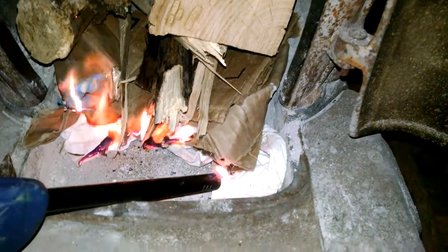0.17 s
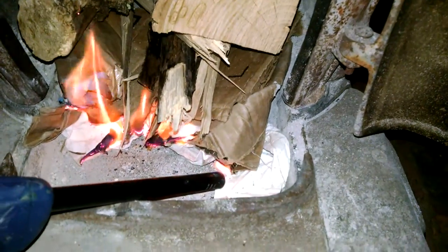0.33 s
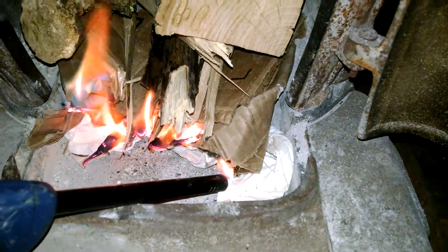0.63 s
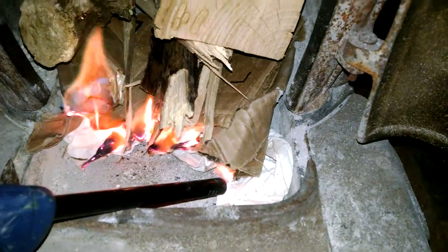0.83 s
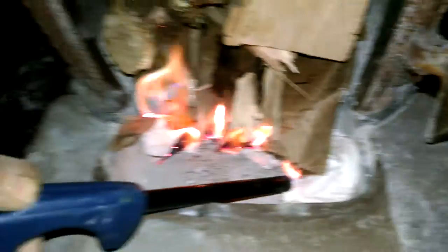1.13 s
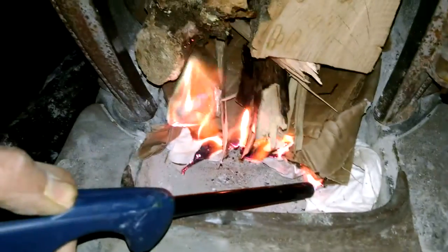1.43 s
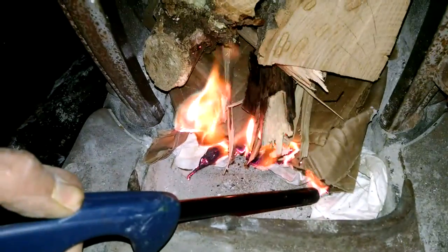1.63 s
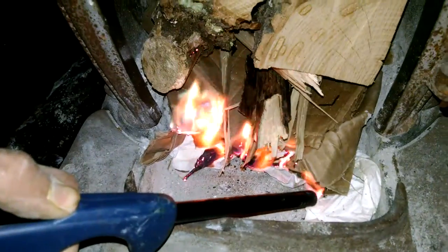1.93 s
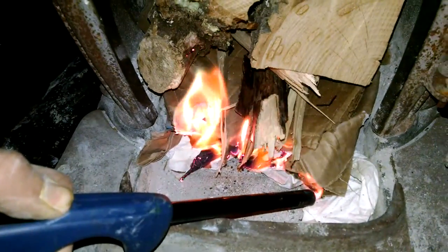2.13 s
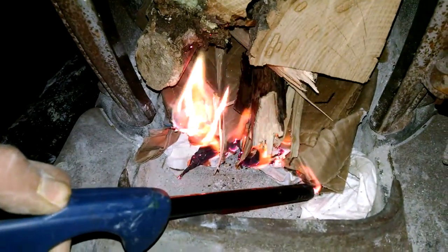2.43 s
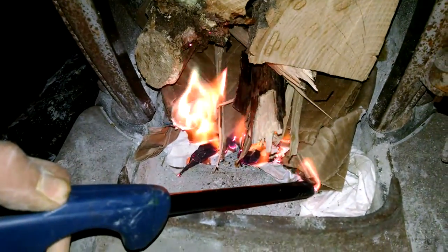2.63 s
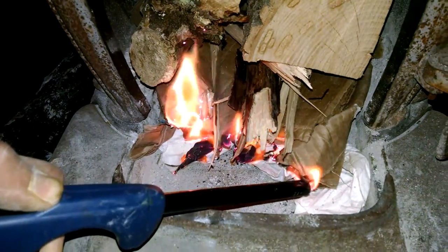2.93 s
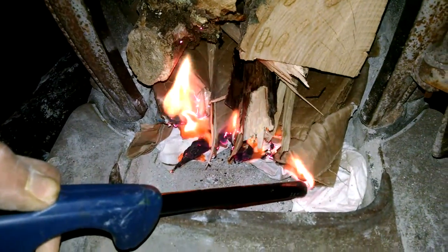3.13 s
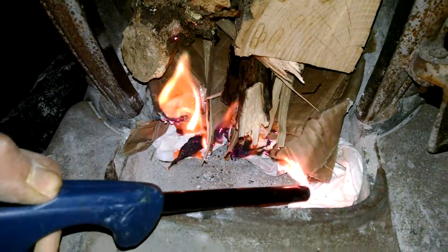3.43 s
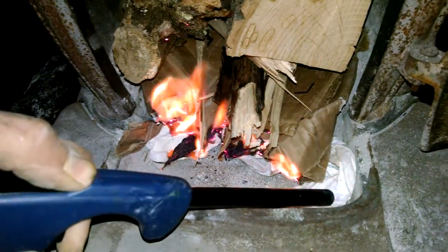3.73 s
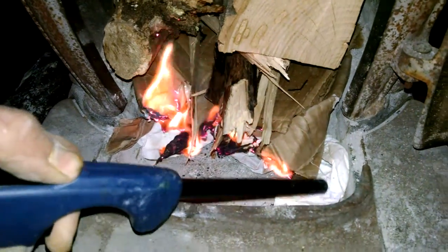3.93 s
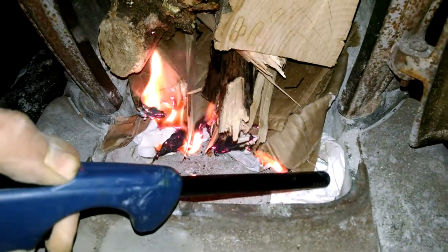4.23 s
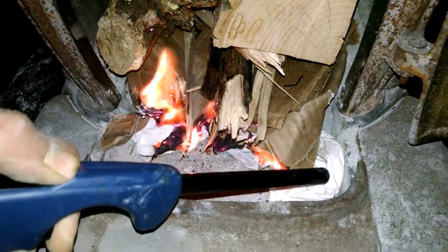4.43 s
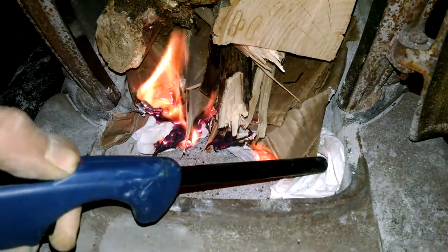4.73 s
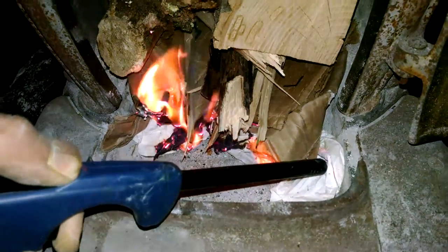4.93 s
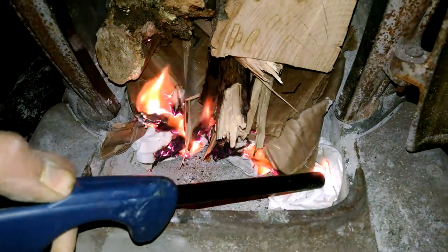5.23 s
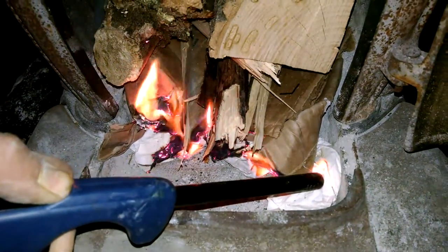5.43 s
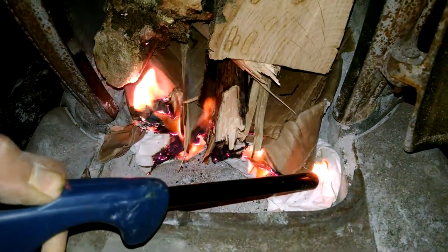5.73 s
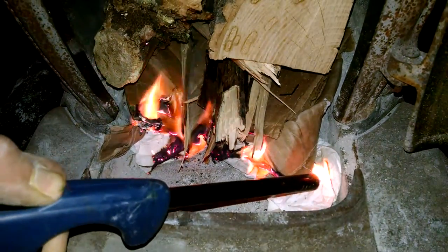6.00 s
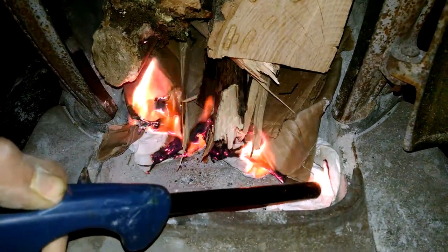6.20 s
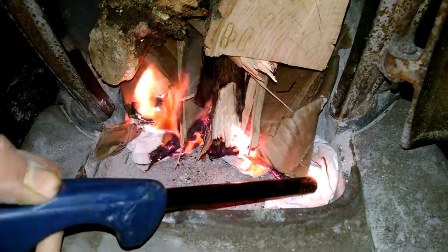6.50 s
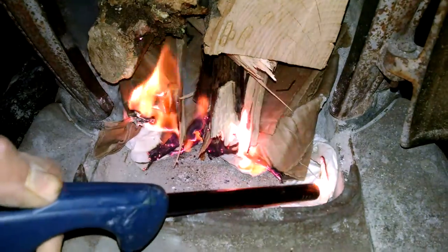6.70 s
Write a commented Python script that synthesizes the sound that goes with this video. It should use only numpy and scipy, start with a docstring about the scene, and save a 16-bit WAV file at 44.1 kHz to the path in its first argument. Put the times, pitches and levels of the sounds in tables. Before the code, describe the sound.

Close up in a small iron stove, paper and cardboard kindling burns with a high, airy sizzle over a very soft draught and faint low rumble. From 0 to 0.4 s a lighter scuffs and bumps the floor dully, ending in a low, briefly ringing knock. Sharp, dry snaps scatter through 0.5-2 s, notably around 1.5-1.65, while the hiss strengthens from about 2.3. Tiny crackles crowd together at 2.75-3.3 s. At 3.32 a hard, loud knock rings shortly, followed until 3.8 by rattling taps and gritty dragging, with a small scrape near 3.95. A bright pop snaps at 4.07. Then it is sparser: faint card ticks, dry paper crinkles, a hiss swell near 5.25 and soft rustles. Crisp pops return at 6.44-6.57, the last strongest with a small papery thud, before a light knock at 6.85.

```python
"""In a wood stove, paper and cardboard kindling catches while a gas lighter is held to it.
A soft draught and rumble lie under a bright sizzle, all made of coloured noise. Random tiny clicks
crackle in bursts; short noise bursts make the pops, ticks and rustles. The lighter knocks and drags
on the stove floor, which rings as a set of fading sines. The recorder widens the stereo with a
short, inverted delay."""
import sys
import numpy as np
from scipy import signal
from scipy.fft import rfft, irfft, next_fast_len
from scipy.io import wavfile

SR = 44100
rng = np.random.default_rng(int(sys.argv[2]) if len(sys.argv) > 2 else 0)


def log_audio(samples):
    """Write samples as a 16-bit WAV file to the path given in sys.argv[1]."""
    # one column per channel
    frames = np.atleast_2d(samples).T
    # limit to full scale, then quantise
    limited = np.clip(frames, -1, 1)
    pcm = np.round(limited * 32767).astype(np.int16)
    wavfile.write(sys.argv[1], SR, pcm)


N = 302545   # samples


def amp(db):
    """Turn dB into a gain."""
    return 10 ** (np.asarray(db) / 20)


def rms_one(x):
    """Scale a sound so that its rms strength is 1."""
    return x / np.sqrt(np.mean(x ** 2) + 1e-20)


def in_time(rows):
    """Join the points of a curve table with straight lines, one value per sample."""
    times, *columns = np.transpose(rows)
    return [np.interp(np.arange(N) / SR, times, column) for column in columns]


SPECTRUM_TOP_HZ = 15800   # nothing above this in coloured noise


def coloured(x, spectrum):
    """Give a sound the tone balance of a spectrum table, cut off at the top, with rms 1."""
    size = next_fast_len(N)
    hz = np.arange(size // 2 + 1) * SR / size + 1   # 1 Hz up, to avoid log(0)
    points_hz, points_db = np.transpose(spectrum)
    gain = amp(np.interp(np.log(hz), np.log(points_hz), points_db))
    gain = gain * (hz < SPECTRUM_TOP_HZ)
    return rms_one(irfft(rfft(x, size) * gain, size)[:N])


def drift(rate_hz):
    """Wander slowly at random: noise smoothed by two poles, rms 1."""
    r = np.exp(-2 * np.pi * rate_hz / SR)
    noise = rng.standard_normal(N + SR)
    wander = signal.lfilter([1], [1, -2 * r, r * r], noise)
    return rms_one(wander[SR:])   # skip the filter's first second


def band(x, low_hz, high_hz):
    """Keep only the pitches between two edges."""
    edges = [low_hz, min(high_hz, .45 * SR)]
    return signal.sosfilt(signal.butter(2, edges, "band", fs=SR, output="sos"), x)


def ring(x, hz, t60):
    """Resonate like one mode: a click of 1 starts a sine of height 1 that fades 60 dB in t60 seconds."""
    r, w = amp(-60 / (t60 * SR)), 2 * np.pi * hz / SR
    return signal.lfilter([0, np.sin(w)], [1, -2 * r * np.cos(w), r * r], x + 1e-18)


def add(out, s, sound):
    """Mix a short sound in at s seconds."""
    i = round(s * SR)
    out[i:i + len(sound)] += sound[:N - i]


def burst(low_hz, high_hz, t60, click):
    """Make a click with a dying noise tail in one band, peak 1."""
    t = np.arange(2000) / SR
    push = rng.standard_normal(len(t)) * amp(-60 * t / t60)
    push[0] = click
    sound = band(push, low_hz, high_hz)
    return sound / np.abs(sound).max()


# tone balance of the draught: f/Hz, level/dB (only the shape matters)
DRAUGHT = [(20, -15), (55, 8), (110, -5), (200, 1.5), (260, 3), (350, -8.5), (460, -9.5), (600, -13),
           (800, -21), (1200, -18.5), (2000, -21), (4000, -18.5), (7000, -19), (15000, -21.5)]
DRAUGHT_DB = -53


def draught():
    """Soft flow of air: coloured noise whose level wanders a little."""
    wander_db = .5 * drift(3) + drift(14)
    return coloured(rng.standard_normal(N), DRAUGHT) * amp(DRAUGHT_DB + wander_db)


PORT_RUMBLE_DB, PORT_RUMBLE_HZ = -56.5, 250   # level, upper edge


def port_rumble():
    """Low rumble at the two microphone ports: separate low noise on each side."""
    noise = band(rng.standard_normal((2, N)), 21.5, PORT_RUMBLE_HZ)
    return amp(PORT_RUMBLE_DB) * rms_one(noise)


# strength of the sizzle as the kindling burns: t/s, level/dB
BURN = [(0.0, -50.5), (0.42, -51), (0.71, -53.5), (1.2, -51), (1.89, -50), (2.29, -45.5), (2.79, -46),
        (3.63, -48), (4.28, -47), (4.57, -50.5), (4.79, -51.5), (5.24, -46.5), (5.7, -52), (5.98, -49.5),
        (6.17, -51.5), (6.5, -47), (6.69, -52), (6.86, -52)]
# tone balance of sizzle and crackle: f/Hz, level/dB (only the shape matters)
SIZZLE = [(3000, -22), (6000, -16), (8000, -9.5), (10000, -3.5), (12000, 0.5), (13800, 5.5), (15000, -4),
          (15800, 5)]


def sizzle():
    """Smooth sizzle of escaping gas: bright noise that follows the burn and flutters quickly."""
    level_db = in_time(BURN)[0] + 1.55 * drift(23)
    return coloured(rng.standard_normal(N), SIZZLE) * amp(level_db)


# flurries of crackle: t/s (start), build-up/s, hold/s, level/dB
FLURRIES = [(0.381, .11, 0.018, -51), (1.344, 0.052, .15, -48.5), (2.034, 0.1, 0.14, -45),
            (2.473, .08, 0.063, -49), (2.756, 0.0052, .085, -46.5), (2.976, 0.038, 0.093, -48.5),
            (3.187, .04, .13, -41.5), (3.598, .09, .03, -46), (3.812, .09, .11, -48),
            (4.24, 0.084, .1, -53.5), (4.943, .2, .3, -55), (5.742, 0.24, .2, -54),
            (6.455, 0.092, 0.045, -51.5)]
FLURRY_FADE_DB_PER_S, CALM_CRACKLE_DB = 195.5, -59.5


def crackle_db():
    """Crackle level over time: each flurry builds up out of the calm, holds and fades."""
    t, level = np.arange(N) / SR, np.full(N, float(CALM_CRACKLE_DB))
    for s, build_s, hold_s, top_db in FLURRIES:
        rising = CALM_CRACKLE_DB + (top_db - CALM_CRACKLE_DB) * (t - s) / build_s
        fading = top_db - FLURRY_FADE_DB_PER_S * (t - s - build_s - hold_s)
        flurry = np.minimum(np.minimum(rising, fading), top_db)
        level = np.maximum(level, flurry)
    return level


DENSER_PER_DB = 1.7   # dB more snaps per second for each dB of crackle


def crackle():
    """Tiny fibres snap at random in uneven clumps, each a click of noise that dies within a millisecond."""
    level_db = crackle_db()
    denser_db = DENSER_PER_DB * (level_db - CALM_CRACKLE_DB)
    snaps_per_s = 400 * amp(3 * drift(30) + denser_db)
    born = rng.random(N) < snaps_per_s / SR
    sizes = amp(6.8 * np.minimum(rng.exponential(1, N), 3.0)) * born
    fading = amp(-60 / (.0007 * SR))
    snaps = signal.lfilter([1], [1, -fading], sizes) * rng.standard_normal(N)
    evened = snaps / amp(denser_db / 2)   # so that more snaps do not also add level
    return amp(level_db) * coloured(evened, SIZZLE)


# lighter knocking the stove floor: t/s, level/dB (base strength), f/Hz (best-struck pitch),
# brightness/(dB per octave above that pitch), woody clack/dB (relative to level)
KNOCKS = [(.002, -36, 610, 0, -31), (.02, -42, 930, -3, -25), (.04, -47, 620, -4, -29),
          (.075, -44, 450, -6, -25), (.112, -40.5, 597, -15, -18), (.14, -50, 600, -15, -20),
          (.18, -38, 452, -16, -20), (.214, -35.5, 452, -3, -23), (.296, -59, 820, -5, -25),
          (.338, -23.5, 435, -27, -31), (.339, -40, 830, -12, -30), (.357, -27.5, 437, -17, -38),
          (3.3245, -12.5, 646, 1, -8), (3.345, -24, 600, 1.5, -5.5), (3.374, -24.5, 667, -2, -13),
          (3.394, -38, 656, -1, -8), (3.483, -32, 550, -11, -15), (3.502, -32, 670, 0.5, -15),
          (3.511, -30, 805, 2, -11), (3.514, -30.5, 484, 5, -19), (3.536, -31.5, 815, -5, -8),
          (3.537, -25, 491, 1, -23), (3.578, -36, 810, -2, -20), (3.605, -29, 550, -6, -7),
          (3.611, -25.5, 827, 3, -31), (3.636, -28.5, 665, 5.5, -15), (3.655, -32, 816, -1, -16),
          (3.661, -26.5, 379, 3.5, -16), (3.672, -27, 815, -1, -24), (3.684, -36, 790, 5, -25),
          (3.697, -41, 805, 1, -12), (3.711, -40, 820, 0, -17), (3.942, -37, 573, 5, -10),
          (6.848, -27, 616, 0.5, -10.5)]
# lighter dragging over the stove floor, one list per stroke: t/s, scuff level/dB, grit level/dB # (the scuff
# level sets the drive into the ringing modes, before their gains; the grit level sets the gritty noise as
# heard)
DRAG = [
    [(0.0, -25.5, -79), (0.03, -36, -79), (0.1, -39, -65), (0.2, -37.5, -57), (0.24, -43.5, -73),
     (0.33, -37, -60), (0.42, -44.5, -82), (0.5, -43, -73)],
    [(3.38, -37, -71), (3.43, -33.5, -55), (3.49, -32, -56.5), (3.52, -26.5, -60), (3.56, -33, -48.5),
     (3.6, -21.5, -52), (3.65, -26.5, -47.5), (3.7, -38, -47.5), (3.73, -39, -49.5), (3.75, -40.5, -57),
     (3.79, -33.5, -54)],
    [(3.91, -38.5, -51), (3.96, -37.5, -70), (4.04, -42.5, -76), (4.12, -56, -77)],
]
# ringing modes of stove floor and lighter barrel: f/Hz, level/dB, t60/s
STOVE = [(303, -7, 0.051), (362.6, -12, 0.18), (452, -7, 0.14), (507.6, -7.5, 0.11), (600.6, -4, 0.15),
         (663, -10.5, 0.057), (755, -39, 0.024), (812.7, -2.5, 0.14), (893, -21.5, 0.075),
         (990, -11.5, 0.25), (1114, -9.5, 0.045), (1356, -16, 0.12), (1800, -17, 0.07), (2630, -11, 0.03),
         (3010, -5, .03), (3305, -13.5, 0.082), (3920, -17, 0.1), (4830, -34, 0.037), (5570, -19, 0.056),
         (6200, -19, 0.13), (6860, -12, 0.13)]
HARD_DB, SLIP_JITTER = -22, 0.067   # softer knocks slide; random spread of their slip spacing


def knock_touches():
    """A hard knock lands at once; a softer one slides in four slips, nearly one best-pitch cycle apart."""
    s, peak_db, best_hz, _, _ = np.transpose(KNOCKS)
    at = np.round(s * SR).astype(int)
    spacing = np.where(peak_db < HARD_DB, 1 / best_hz, 0)[:, None]
    uneven = 1 + SLIP_JITTER * rng.standard_normal((len(s), 1))
    slip_times = spacing * np.arange(4) * uneven
    return np.minimum(at[:, None] + np.round(slip_times * SR).astype(int), N - 1)


def drag_strokes():
    """Pressure and grit gains over time, silent between the strokes."""
    pressure, grit = np.zeros((2, N))
    for rows in DRAG:
        times, scuff_db, grit_db = np.transpose(rows)
        t = np.arange(round(times[0] * SR), round(times[-1] * SR))
        pressure[t] = amp(np.interp(t / SR, times, scuff_db))
        grit[t] = amp(np.interp(t / SR, times, grit_db))
    return pressure, grit


def lighter():
    """Knocks favour the modes near where they land; dragging feeds the low modes uneven, wandering slips."""
    s, peak_db, best_hz, bright_db, clack_db = np.transpose(KNOCKS)
    spread = rng.standard_normal((len(s), len(STOVE)))
    touches = knock_touches()
    pressure, grit = drag_strokes()
    slip_clicks = (rng.random(N) < 1500 / SR) * rng.standard_normal(N)
    slips = rms_one(slip_clicks * amp(3.0 * drift(40)))
    scuff = band(band(slips, 282, 780), 282, 780) * pressure
    out = scuff   # the dull scuff is heard directly too
    for k, (hz, mode_db, t60) in enumerate(STOVE):
        push = scuff * amp(-41.0 + 4.1 * drift(25.0))
        octaves = np.log2(hz / best_hz)
        favour_db = 14.1 * np.exp(-(octaves / 0.27) ** 2)
        tilt_db = bright_db * np.maximum(octaves, 0)
        strength = amp(peak_db - 13.5 + favour_db + tilt_db + 2.2 * spread[:, k])
        np.add.at(push, touches, strength[:, None] / 4)   # shared by the four touches
        out = out + amp(mode_db) * ring(push, hz, t60) * (-1) ** k
    gritty = band(rng.standard_normal(N) + 1.0 * slips, 680, 19000)
    out = band(out, 220, 21000) + grit * gritty
    for when, level_db in zip(s, peak_db + clack_db):
        woody = burst(570, 935, 0.13, 3.3)
        crack = burst(1400, 14500, .03, 4.0)
        add(out, when, amp(level_db) * (woody + amp(2.5) * crack))
    return out


SMALL_POPS, SMALL_POP_DB, SMALL_POP_SPREAD_DB = 120, -34, 3   # count, middle level, spread either way
SMALL_POP_BODY_DB = -31   # middle body level, relative to the click
SMALL_POP_GROWTH = 0.16   # dB per dB of crackle


def small_pops():
    """Draw small pops that crowd into the flurries and grow with them."""
    level_db = crackle_db()
    share = np.cumsum(amp(level_db))
    when, size, body = rng.random((SMALL_POPS, 3)).T
    at = np.searchsorted(share, (np.arange(SMALL_POPS) + when) / SMALL_POPS * share[-1])
    growth_db = SMALL_POP_GROWTH * (level_db[at] - CALM_CRACKLE_DB)
    pop_db = SMALL_POP_DB + growth_db + SMALL_POP_SPREAD_DB * (2 * size - 1)
    body_db = SMALL_POP_BODY_DB + 2 * SMALL_POP_SPREAD_DB * (2 * body - 1)
    return list(zip(at / SR, pop_db, body_db))


# the clearest snaps of fibre: t/s, level/dB (peak of the click), body level/dB (relative to the click)
POPS = [(0.1281, -16.5, -19.5), (0.1318, -32, -22), (0.1405, -36, -22), (0.1475, -31, -25),
        (0.198, -35, -27), (0.288, -23, -15), (0.463, -25.5, -6), (0.479, -31, -7), (0.517, -28, -30),
        (0.526, -27, -16), (0.539, -13, -26), (0.578, -31, -30), (0.598, -31, -30), (0.659, -32, -30),
        (0.676, -18.5, -20), (0.744, -31, -5), (0.7978, -17.5, -12.5), (0.8096, -24, -9),
        (0.9067, -20, -18), (0.915, -18.5, -19), (1.134, -21, -11.5), (1.254, -27, -16), (1.26, -31, -9),
        (1.273, -34, -18), (1.3646, -20.5, -18), (1.386, -30, -15), (1.4145, -26, -22), (1.4202, -19, -22),
        (1.429, -28, -22), (1.468, -12, -24), (1.477, -17, -40), (1.5328, -18, -26), (1.545, -26, -24),
        (1.551, -23, -25), (1.643, -11, -22), (1.7665, -22, -16), (1.975, -25, -25), (2.1316, -20, -18),
        (2.167, -29, -35), (2.1733, -23, -30), (2.177, -26, -30), (2.2007, -22, -30), (2.218, -18, -18),
        (2.2382, -30, -25), (2.2573, -29, -35), (2.319, -18.5, -20), (2.3594, -21, -41), (2.387, -21, -26),
        (2.4345, -31, -32), (2.538, -23, -37), (2.553, -20, -21), (2.578, -23, -16), (2.6995, -20, -18),
        (2.7185, -32, -35), (2.767, -25, -35), (2.769, -19.5, -31), (2.7768, -17, -39), (2.780, -23, -35),
        (2.783, -24, -35), (2.7902, -27, -35), (2.793, -26, -35), (2.796, -16, -35), (2.8024, -21, -35),
        (2.8086, -20, -35), (2.8155, -22, -35), (2.8182, -21, -35), (2.823, -31, -35), (2.8266, -22, -35),
        (2.838, -22, -23), (2.8445, -25, -35), (2.8512, -17.5, -24), (2.8695, -27, -35), (2.8855, -33, -35),
        (2.9, -33, -35), (2.9716, -17.5, -23), (3.0016, -21, -27), (3.012, -23, -32), (3.014, -17, -29),
        (3.021, -31, -32), (3.0288, -29, -32), (3.0387, -26, -32), (3.0518, -21, -32), (3.065, -24, -32),
        (3.0675, -21, -32), (3.077, -19, -24), (3.083, -22, -30), (3.1284, -11.5, -27), (3.138, -26, -34),
        (3.1455, -24, -30), (3.151, -25, -34), (3.169, -24, -34), (3.193, -24, -30), (3.213, -21, -34),
        (3.217, -29, -34), (3.232, -28, -34), (3.242, -27, -34), (3.25, -27, -34), (3.2587, -41, -21),
        (3.2723, -26, -9), (3.279, -18, -32), (3.288, -21, -32), (3.361, -24, -7), (3.64, -23, -25),
        (3.673, -20, -32), (3.717, -23, -22), (3.727, -22, -21), (3.836, -18.5, -15.5), (3.8865, -21, -16),
        (3.911, -13.5, -36), (3.941, -22, -15), (4.001, -21, -26), (4.0744, -9, -28), (4.1302, -17.5, -27),
        (4.1705, -22, -29), (4.489, -20, -23), (4.574, -23, -13), (4.596, -24, -11), (5.009, -29.5, -9),
        (5.175, -17.5, -29), (5.759, -24, -17), (5.783, -30.5, -6), (5.848, -23, -11), (5.9131, -38, -40),
        (6.433, -20, -33), (6.4402, -12.5, -20), (6.4922, -14, -33), (6.4936, -22, -30), (6.4942, -25, -30),
        (6.4954, -23, -30), (6.4966, -30, -30), (6.5352, -27, -20), (6.537, -25, -20), (6.5618, -7, -21),
        (6.564, -13, -15), (6.564, -20, -13), (6.693, -30, -13), (6.7674, -27.5, -8)]


def pops():
    """Fibres snap: each pop is a very short bright click with a longer, duller body."""
    out = np.zeros(N)
    for s, pop_db, body_db in list(POPS) + small_pops():
        click = burst(10800, 16500, .002, 7.0)
        body = burst(2000, 11000, .015, 6.0)
        add(out, s, amp(pop_db) * (click + amp(body_db) * body))
    return out


# paper curling and slumping: t/s, length/s, f/Hz (centre), level/dB (before the fade)
RUSTLES = [(0.163, 0.012, 1630, -55.5), (0.4605, 0.025, 3900, -47.5), (0.735, 0.012, 2630, -58),
           (1.022, 0.024, 3520, -58), (1.396, 0.27, 1340, -67.5), (2.216, 0.032, 2950, -57),
           (3.27, .008, 3500, -60), (5.232, 0.017, 1210, -58.5), (5.236, 0.028, 2600, -55.5),
           (5.258, 0.015, 202, -55), (5.369, 0.028, 325, -48.5), (6.441, 0.0068, 1910, -40),
           (6.443, 0.017, 580, -45.5), (6.564, 0.011, 1670, -45.5), (6.566, 0.0088, 527, -36),
           (6.58, 0.029, 574, -51.5), (6.654, 0.009, 5650, -48.5)]


def rustles():
    """Paper curls and slumps: crumbly noise around one pitch, sudden and fading."""
    out = np.zeros(N)
    for s, length, hz, level_db in RUSTLES:
        t = np.arange(round(2 * length * SR)) / SR
        noise = band(rng.standard_normal(len(t)), hz / 1.33, hz * 1.38)
        fade = np.exp(-(t / length) ** 2)
        add(out, s, amp(level_db) * rms_one(noise) * fade)
    return out


SMALL_TICKS, SMALL_TICK_DB, SMALL_TICK_SPREAD_DB = 30, -50, 4.0   # count, middle level, spread either way
SMALL_TICK_LOW_HZ, SMALL_TICK_HIGH_HZ = 350, 950


def small_ticks():
    """Draw faint ticks at any time and any pitch in their range."""
    when, size, pitch = rng.random((SMALL_TICKS, 3)).T
    level_db = SMALL_TICK_DB + SMALL_TICK_SPREAD_DB * (2 * size - 1)
    hz = SMALL_TICK_LOW_HZ * (SMALL_TICK_HIGH_HZ / SMALL_TICK_LOW_HZ) ** pitch
    return list(zip(when * N / SR, level_db, hz))


# the clearest ticks of card and char settling: t/s, level/dB (peak), f/Hz (centre)
TICKS = [(0.517, -46.5, 490), (0.725, -42.5, 507), (0.796, -34, 900), (0.837, -45, 674), (0.905, -42, 593),
         (1.133, -36.5, 785), (1.228, -44.5, 870), (1.271, -46.5, 920), (1.3637, -31.5, 286),
         (1.365, -38.5, 110), (1.939, -46, 775), (2.217, -47, 870), (2.526, -39.5, 480), (2.606, -46, 467),
         (2.709, -49, 1110), (3.911, -40, 524), (4.074, -43.5, 447), (4.15, -46, 925), (4.381, -51, 930),
         (4.573, -44, 428), (4.753, -43.5, 590), (4.835, -45, 487), (5.176, -43, 760), (5.237, -54, 1110),
         (5.262, -42.5, 420), (5.372, -47, 450), (5.389, -42, 414), (5.437, -47, 940), (5.488, -53, 654),
         (5.835, -43, 910), (6.203, -50, 715), (6.414, -42, 560), (6.462, -47, 795), (6.484, -49, 497),
         (6.492, -49, 600), (6.515, -44, 474), (6.527, -57, 480), (6.556, -37, 400), (6.563, -31, 560),
         (6.658, -38.5, 475)]


def ticks():
    """Card and char settle: each tick is a short wooden thud around one pitch."""
    out = np.zeros(N)
    for s, peak_db, hz in list(TICKS) + small_ticks():
        add(out, s, amp(peak_db) * burst(hz / 1.9, hz * 1.5, 0.055, 16.0))
    return out


# faint dry ticks of charring paper: t/s, level/dB (peak), f/Hz (centre)
CRINKLES = [(0.7218, -47, 1470), (0.7973, -47, 1440), (1.1323, -53, 1470), (1.2285, -40, 1240),
            (1.271, -37, 3940), (1.363, -46, 1350), (1.625, -45, 1440), (1.6417, -46, 3310),
            (2.218, -52, 1330), (2.2882, -45, 3560), (2.5985, -34.5, 3400), (2.7092, -45, 1460),
            (3.2715, -38, 3330), (4.0307, -43, 1790), (4.15, -50, 1440), (4.5725, -46, 1480),
            (5.038, -38, 3810), (5.175, -43, 1710), (5.4365, -45, 1630), (5.7074, -38, 3870),
            (5.7907, -52, 1280), (5.8356, -43, 1260), (6.1422, -36, 3760), (6.2008, -45, 1510),
            (6.4396, -31, 1440), (6.561, -32, 1360), (6.6386, -43, 1510), (6.657, -42, 1660),
            (6.7151, -48, 3560)]


def crinkles():
    """Charring paper ticks drily: shorter bursts, each around one pitch."""
    out = np.zeros(N)
    for s, peak_db, hz in CRINKLES:
        add(out, s, amp(peak_db) * burst(hz / 1.8, hz * 2.2, .018, 9.0))
    return out


def firebox(x):
    """Add a few close echoes off the iron walls."""
    out = x.copy()
    for lag_s, echo_db in [(.0007, -12), (.0019, -19), (.0041, -24)]:
        lag = round(lag_s * SR)
        out[lag:] += amp(echo_db) * x[:-lag]
    return out


def scene():
    """Mix the stove sounds at one point, plus a separate rumble at each microphone port."""
    kindling = firebox(pops() + rustles() + ticks() + crinkles())
    near = draught() + sizzle() + crackle() + lighter() + kindling
    return near + port_rumble()


LEFT_LAG = 17   # samples
CUTOFF_HZ = 16700   # 70 dB down from here up


def record(dry):
    """Widen the stereo: the left is inverted and late, but turns back into step from bass to lower mids."""
    size = next_fast_len(N + 4096)
    hz = np.arange(size // 2 + 1) * SR / size + 1e-3
    inverted_delay = 2 * np.pi * hz * LEFT_LAG / SR - np.pi
    back_in_step = -2 * np.arctan(130 / hz)
    lag = np.maximum(inverted_delay, back_in_step)   # radians
    # the left is softer in the bass and the treble
    softer_db = np.interp(hz, [200, 300, 4000, 9000, 14000], [-3.0, 0.0, 0.0, -3.0, -1.5])
    left = irfft(rfft(dry[0], size) * amp(softer_db) * np.exp(-1j * lag), size)[:N]
    low_pass = signal.cheby2(12, 70, CUTOFF_HZ, fs=SR, output="sos")
    return signal.sosfilt(low_pass, [left, dry[1]])


dry = scene()
out = record(dry)
log_audio(out)
```